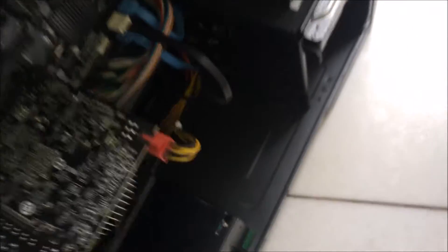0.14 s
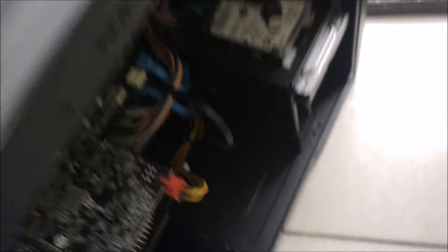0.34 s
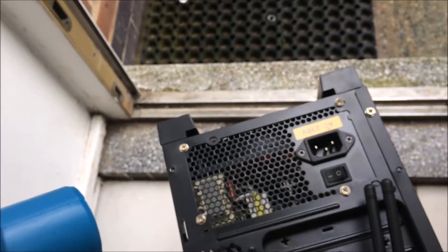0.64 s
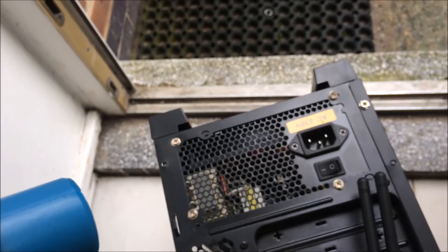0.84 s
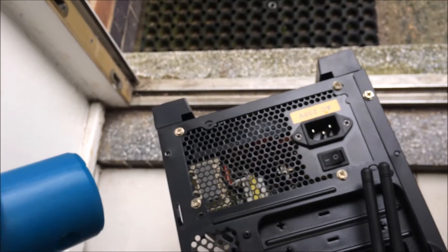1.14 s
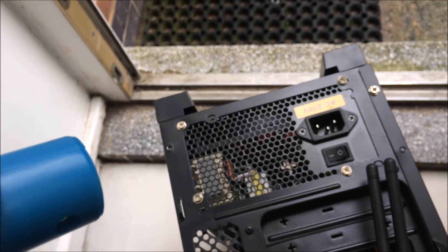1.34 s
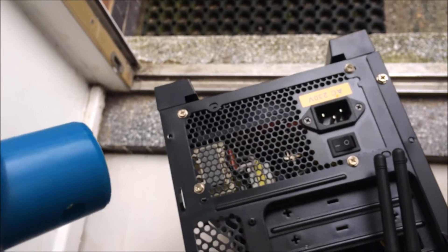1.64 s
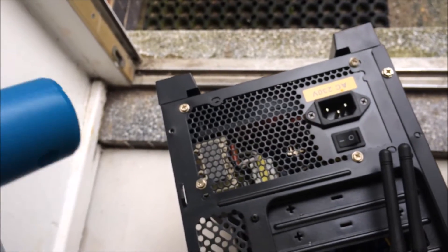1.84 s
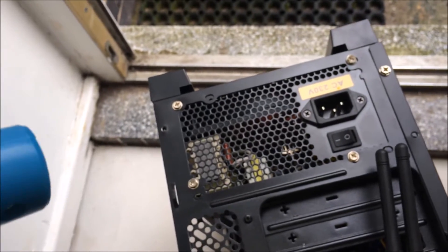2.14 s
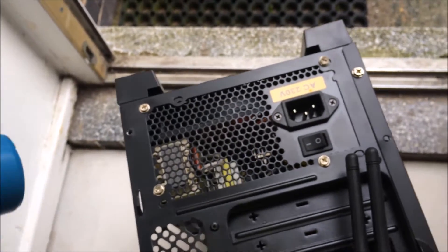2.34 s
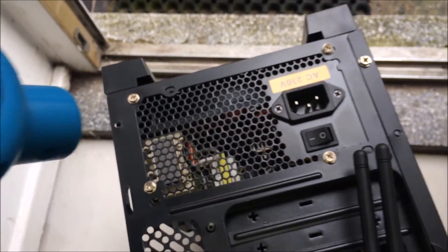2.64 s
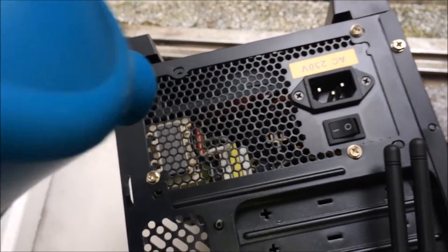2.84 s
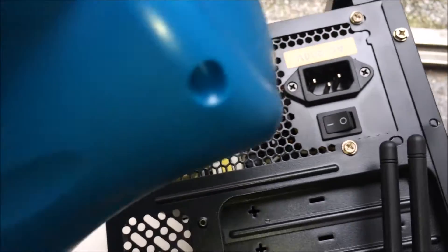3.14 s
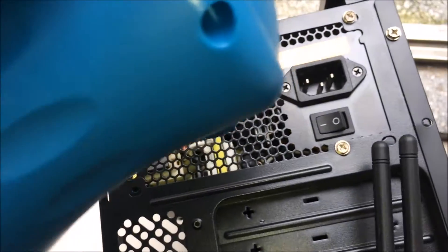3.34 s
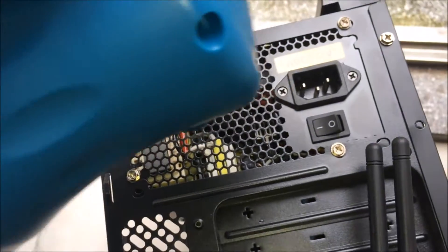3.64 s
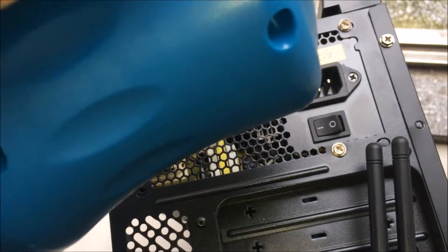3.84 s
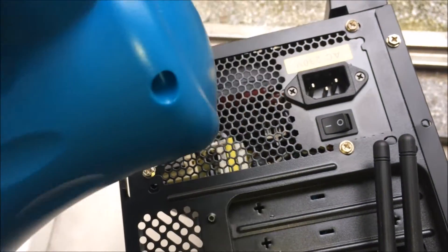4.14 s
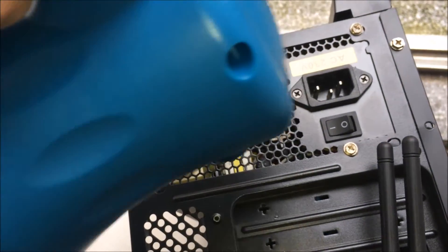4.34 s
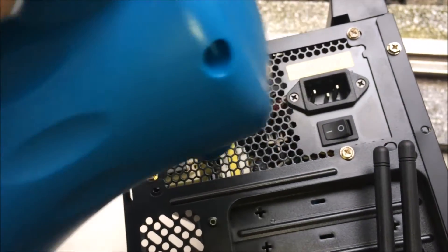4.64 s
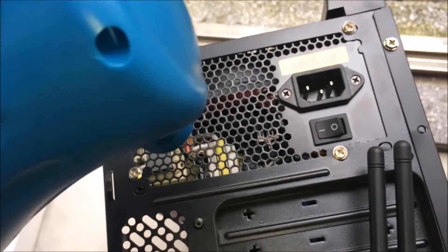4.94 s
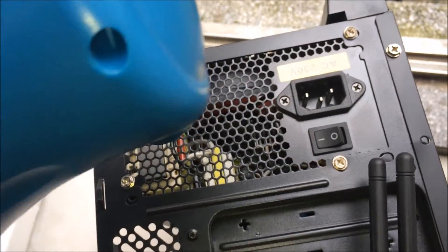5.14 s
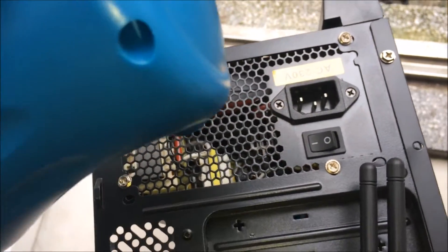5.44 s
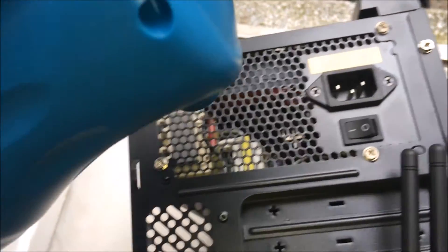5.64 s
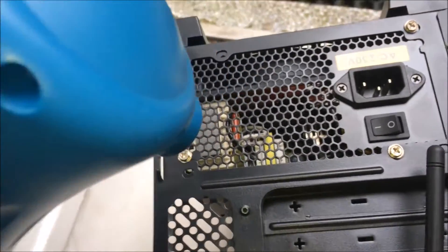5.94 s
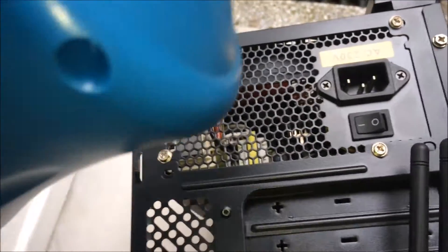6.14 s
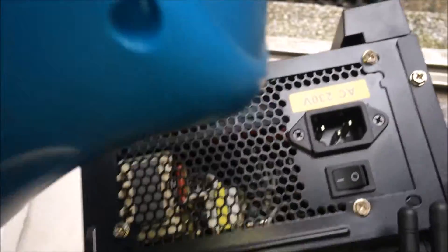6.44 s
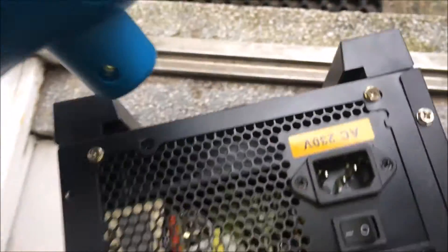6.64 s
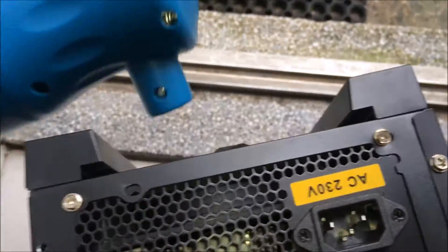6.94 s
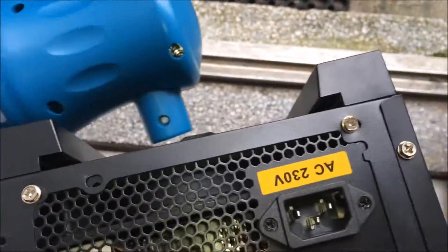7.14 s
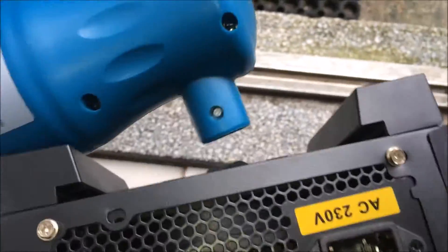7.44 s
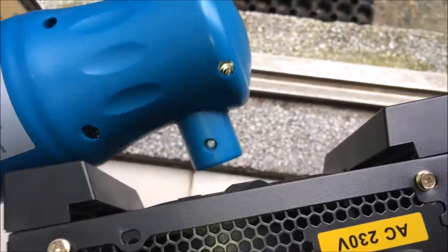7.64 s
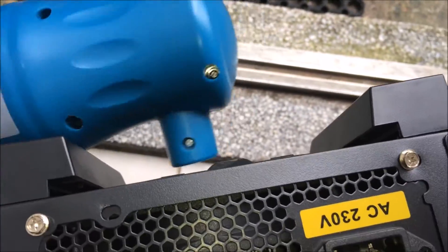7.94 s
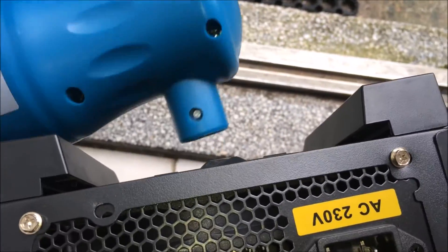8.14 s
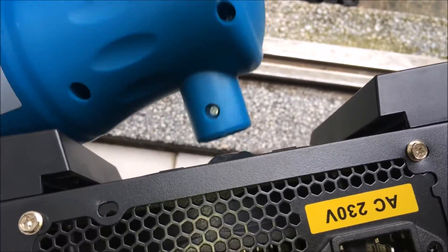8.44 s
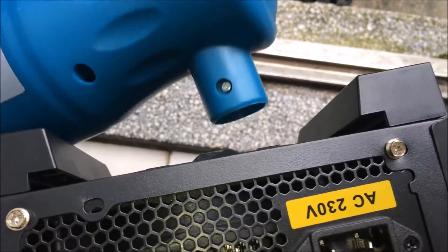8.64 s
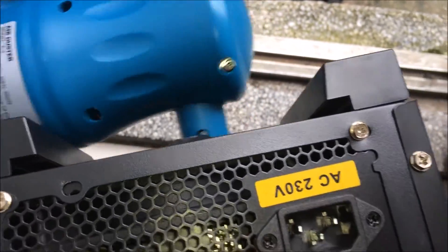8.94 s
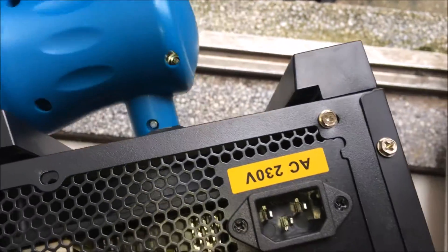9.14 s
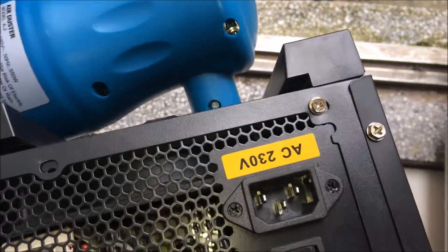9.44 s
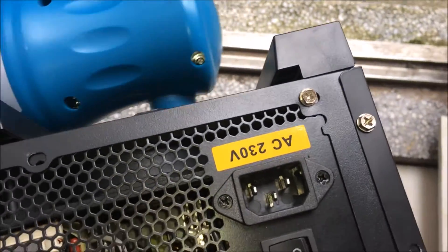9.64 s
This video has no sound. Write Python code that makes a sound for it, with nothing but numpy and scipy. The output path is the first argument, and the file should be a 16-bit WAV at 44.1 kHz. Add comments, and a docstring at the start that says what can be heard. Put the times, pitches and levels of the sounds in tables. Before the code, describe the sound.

A hand-held electric air duster blows into an open computer case with a loud rush and steady whine, then stops abruptly. A faint, dull outdoor rumble and two light clicks fill the pause. The switch snaps, the motor quickly spins up, and air rushes on through the case and its grille, with shifting whistles and hollow roars. It is close to the microphone, which catches a few soft puffs.

```python
"""A loud rush of air with a steady whine: a hand-held electric air duster blows into an open computer case.
It stops abruptly, leaving a dull outdoor murmur at the open door, faint rustles and two light clicks.
The switch snaps on, the impeller spins back up to its whine, and the jet rushes through the case and
the power supply's honeycomb grille. Their cavities colour it as the nozzle moves about; edges howl,
the grille roars, and a few puffs strike the microphone."""
import sys
import numpy as np
from scipy import signal
from scipy.fft import rfft, irfft
from scipy.io import wavfile
from scipy.ndimage import map_coordinates

SR = 44100
rng = np.random.default_rng(int(sys.argv[2]) if len(sys.argv) > 2 else 0)


def transcribe(signal):
    """Save signal, clipped to [-1, 1], as a 16-bit WAV file at the path in sys.argv[1]."""
    frames = np.atleast_2d(signal).T
    limited = np.clip(frames, -1, 1)
    pcm = np.round(limited * 32767).astype(np.int16)
    wavfile.write(sys.argv[1], SR, pcm)


N = 432180
T = np.arange(N) / SR
HZ = np.maximum(np.arange(N // 2 + 1) * SR / N, 1)
STOP_S, RESTART_S = 0.503, 1.879


def from_db(db):
    """Decibels to gain."""
    return 10 ** (np.asarray(db) / 20)


def unit_rms(x):
    """Scale to unit rms."""
    return x / np.sqrt(np.mean(x ** 2) + 1e-20)


def curves(rows):
    """Each column after the time, interpolated at every sample."""
    times_s, *columns = np.transpose(rows)
    return [np.interp(T, times_s, column) for column in columns]


def ramp(centre_s, length_s):
    """Linear rise from 0 to 1."""
    return np.clip((T - centre_s) / length_s + .5, 0, 1)


def swell(centre_s, length_s):
    """Smooth rise to 1 and fall; length at half height."""
    return np.cos(np.pi / 2 * np.clip((T - centre_s) / length_s, -1, 1)) ** 2


def drift(rate_hz, size=N):
    """Smooth random motion of unit rms."""
    step, settle = 20, 4000
    pole = np.exp(-2 * np.pi * step * rate_hz / SR)
    white = rng.standard_normal(size // step + settle + 2)
    slow = signal.lfilter([1], [1, -2 * pole, pole * pole], white)[settle:]
    return np.interp(np.arange(size) / step, np.arange(len(slow)), unit_rms(slow))


def narrow_noise(angle, width_hz):
    """Noise band of unit rms around a running phase."""
    size = len(angle)
    return unit_rms(drift(width_hz, size) * np.cos(angle) + drift(width_hz, size) * np.sin(angle))


def coloured_noise(colour, resonances=(), ripple_db=0):
    """Unit-rms noise with a broad colour, resonances and the fine ripple of close reflections."""
    hz, level_db = np.transpose(colour)
    shape_db = np.interp(np.log(HZ), np.log(hz), level_db)
    for centre_hz, width_hz, peak_db in resonances:
        shape_db += peak_db / (1 + (2 * (HZ - centre_hz) / width_hz) ** 2)
    for delay_s in rng.uniform(.002, .02, size=6):
        shape_db += ripple_db * np.cos(2 * np.pi * HZ * delay_s) / np.sqrt(3)
    return unit_rms(irfft(rfft(rng.standard_normal(N)) * from_db(shape_db), N))


def split_bands(x, edges_hz):
    """The bands between neighbouring edges."""
    spectrum = rfft(x)
    return [irfft(spectrum * ((HZ >= low) & (HZ < high)), N) for low, high in zip(edges_hz, edges_hz[1:])]


def impeller_speed(energy_tau_s=.17):
    """Share of full speed, 1 until the restart; then the motor feeds in energy until drag balances it."""
    energy = 1 - np.exp(-np.maximum(T - RESTART_S, 0) / energy_tau_s)
    return np.where(T < RESTART_S, 1, np.sqrt(energy))


# Jet spectrum at each place. Each row: frequency in Hz, relative density in dB.
CASE_COLOUR = [(30, -27.5), (65, -15), (120, -7), (330, -9.5), (480, -2), (1050, -5), (2000, -6.5),
               (5300, -9), (7500, -5.5), (10000, -16), (15000, -22.5)]
APPROACH_COLOUR = [(30, -30), (65, -15), (120, -12), (330, -22.5), (480, 1), (1050, -6), (2000, -3),
                   (5300, -9), (7500, -8.5), (10000, -12.5), (15000, -22)]
GRILLE_COLOUR = [(30, -35.5), (65, -17.5), (120, -8), (330, -23.5), (480, -0.9), (1050, -5), (2000, 1),
                 (5300, -3), (7500, -3), (10000, -7), (15000, -16)]
UNDERSIDE_COLOUR = [(30, -25.5), (65, -14), (120, -4.5), (330, -13.5), (480, 1), (1050, -5.5), (2000, 1.5),
                    (5300, 1.5), (7500, 0), (10000, -4.5), (15000, -13.5)]
VENT_COLOUR = [(30, -35.5), (65, -24), (120, -12.5), (330, -22), (480, -3.5), (1050, -12), (2000, 2),
               (5300, -2.5), (7500, -2.5), (10000, -7.5), (15000, -15.5)]
# Air resonances; the boom is common to all places. Each row: centre in Hz, width in Hz, gain in dB.
BOOM = (123, 21, 4.7)
CASE_CAVITIES = [(177, 45, 5.3), (255, 38, 5.3), (2180, 380, 9.5), (2640, 90, 6), (2980, 200, 4.5),
                 (3380, 130, 7.5), (3785, 80, 9), (4280, 130, 6), (4500, 170, 6), (5580, 120, 3),
                 (6090, 220, 5.5), (7010, 130, 3), (9640, 102, 5)]
APPROACH_CAVITIES = [(180, 116, 9.3), (276, 137, 18.5), (493, 70, 3.9), (750, 320, 1.5), (1130, 140, 5.2),
                     (2100, 93, 4.5), (2505, 700, 4.2), (3700, 340, 6.5), (4460, 380, 6.4), (6070, 410, 6),
                     (7000, 700, 4.4), (7670, 260, 4.5)]
GRILLE_CAVITIES = [(185, 70, 5), (263, 104, 16), (337.7, 42, 16), (712, 340, 10), (1490, 1100, 3.5),
                   (2590, 190, 3.5), (2950, 200, -1.5), (3470, 290, 5), (3830, 83, 3), (4200, 140, -0.5),
                   (4440, 230, 4.5), (6720, 990, 2.5)]
UNDERSIDE_CAVITIES = [(222, 17, 7), (336, 134, 11.5), (710, 200, 6.1), (880, 110, -2), (1160, 540, 7.5),
                      (1770, 260, 2), (2549, 200, 1.2), (3715, 420, 2), (5060, 500, -0.5)]
VENT_CAVITIES = [(200, 170, 9), (345, 148, 13.5), (746, 240, 10.5), (1050, 94, 11), (1320, 530, 6.4),
                 (1780, 290, 3.5), (2580, 90, 2.5), (2924, 170, -2), (3670, 200, 3.5), (3940, 130, 3.5)]
# Moves to the next place. Each row: centre in seconds, length in seconds.
NOZZLE_MOVES = [(1.0, 0.092), (3.032, 0.54), (6.864, 0.77), (8.961, 0.24)]


def turbulence(rush_band_hz=(1000, 7000)):
    """The jet excites the cavities of each place in turn, at equal strength in the rush band."""
    places = [(CASE_COLOUR, CASE_CAVITIES), (APPROACH_COLOUR, APPROACH_CAVITIES),
              (GRILLE_COLOUR, GRILLE_CAVITIES), (UNDERSIDE_COLOUR, UNDERSIDE_CAVITIES),
              (VENT_COLOUR, VENT_CAVITIES)]
    noises = [coloured_noise(colour, [BOOM, *cavities], ripple_db=1.11) for colour, cavities in places]
    air, *later = [noise / split_bands(noise, rush_band_hz)[0].std() for noise in noises]
    for (centre_s, length_s), arriving in zip(NOZZLE_MOVES, later):
        share = ramp(centre_s, length_s)
        air = np.sqrt(1 - share) * air + np.sqrt(share) * arriving
    return air


def nozzle_wander(air, pitch_share=.011, rate_hz=1.5):
    """The nozzle is never still, so all resonances slide slightly up and down."""
    position = np.cumsum(1 + pitch_share * drift(rate_hz))
    return map_coordinates(air, [position], order=3, mode="mirror")


def panel_echoes(air, count=3, reflect_db=-15, above_hz=1200):
    """Steel panels reflect the short waves; the hand wanders, so the echoes shift and the rush phases."""
    delays_s = rng.uniform(.002, .008, count)
    short_waves = signal.sosfilt(signal.butter(2, above_hz, "high", fs=SR, output="sos"), air)
    echoes = [np.interp(T - delay_s - .0002 * drift(.7), T, short_waves, left=0) for delay_s in delays_s]
    return air + from_db(reflect_db) * sum(echoes)


# The jet meets more or less of the case. Each row: time in seconds, strength in dB.
FIRST_BLOW = [(0.02, -15), (0.17, -13.5), (0.324, -15.5), (0.48, -14.5)]
SECOND_BLOW = [(2.05, -10.5), (2.55, -12.5), (3.15, -16), (3.4, -15), (3.75, -16.5), (4.35, -13.5),
               (4.6, -14.5), (4.75, -16.5), (5.03, -13), (5.35, -17.0), (5.8, -15.5), (6.1, -13),
               (6.28, -15.5), (6.45, -13.5), (6.87, -13), (7.07, -15.5), (7.38, -13), (8.35, -13.5),
               (8.9, -13), (9.23, -11.5), (9.39, -14.5), (9.57, -12.5), (9.79, -12.5)]
# Limits of five bands: rumble, hollow roar, rush, hiss, fizz.
BAND_EDGES_HZ = [26, 400, 1000, 2800, 7000, 18000]
# Each row: a band's share of the strength swing, exponent of speed, eddy spread in dB.
BAND_RESPONSE = [(.75, 0.56, 1.53), (0.61, 1.2, 1.26), (1.02, 1.6, 0.75), (0.91, 1.4, 0.5),
                 (0.35, 1.8, 0.44)]
# Fizz flares at the case's top edge, then drops in the lee.
# Each row: centre in seconds, length in seconds, gain in dB.
EDGE_SWEEP = [(6.83, 0.082, 3.5), (7.036, 0.16, -4)]


def jet(gust_spread_db=0.26, trim_db=-1.0):
    """The rush grows with impeller speed; gusts move all bands together, eddies move each alone."""
    bands = split_bands(panel_echoes(nozzle_wander(turbulence())), BAND_EDGES_HZ)
    bands[-1] *= from_db(sum(db * swell(centre_s, length_s) for centre_s, length_s, db in EDGE_SWEEP))
    strength_db, = curves([*FIRST_BLOW, *SECOND_BLOW])
    median_db = np.median(strength_db)
    speed = impeller_speed()
    gust_db = gust_spread_db * drift(7.7)
    out = np.zeros(N)
    for band, (swing, exponent, eddy_db) in zip(bands, BAND_RESPONSE):
        level_db = median_db + swing * (strength_db - median_db) + gust_db + eddy_db * drift(25)
        out += band * speed ** exponent * from_db(level_db + trim_db)
    return out


# Motor at full speed. Each row: time in seconds, turns per second, base level of the orders in dB.
FIRST_RUN = [(0.06, 685.7, -20.5), (0.398, 680, -24.5), (0.47, 685.4, -25)]
SECOND_RUN = [(2.2, 682.8, -27.5), (2.55, 682.8, -26.5), (3.05, 687, -20.5), (5.2, 687.7, -21.5),
              (5.8, 686.6, -20.5), (6.35, 686.3, -21.5), (6.85, 684.9, -24.5), (7.3, 689, -20.5),
              (8.7, 687, -22), (9.79, 685, -22)]
# Unbalance tone and octave of the blade tone. Each row: multiple of the speed, relative level in dB.
ORDERS = [(1, -1), (14, -22)]
# Blade whistle, varying as the blower is turned. Each row: time in seconds, full-speed level in dB.
BLADE_TONE = [(2.6, -39), (3.3, -34.5), (4.6, -38), (5.6, -31.5), (6.2, -44), (7, -41), (7.7, -47),
              (9.7, -33)]
# Each row: centre in seconds, length in seconds, multiple of the speed, width in Hz, level in dB.
SPIN_UP_TONES = [(1.985, .07, 3.04, 95, -20.5), (2.1, .14, 3, 100, -19.5), (2.21, 0.15, 7, 60, -21)]


def whine(blades=7, waver_share=0.000706, flutter_db=1.0, speed_exponent=1.5):
    """Tones locked to the impeller flutter in the moving air; rough ones flare as it gathers speed."""
    full_speed_hz, level_db = curves([*FIRST_RUN, *SECOND_RUN])
    speed = impeller_speed()
    rotation_hz = full_speed_hz * speed * (1 + waver_share * drift(5))
    angle = 2 * np.pi * np.cumsum(rotation_hz) / SR
    tones = sum(from_db(level_db + db + flutter_db * drift(8.1)) * np.sin(order * angle)
                for order, db in ORDERS)
    blade_db = curves(BLADE_TONE)[0] + flutter_db * drift(5.9)
    whistle = from_db(blade_db) * np.sin(blades * angle)
    climbing = sum(from_db(db) * swell(centre_s, length_s) * narrow_noise(order * angle, width_hz)
                   for centre_s, length_s, order, width_hz, db in SPIN_UP_TONES)
    return np.sqrt(2) * speed ** speed_exponent * (tones + whistle) + climbing


# Each row: centre in seconds, length in seconds, start and end pitch in Hz, width in Hz, level in dB.
HOWLS = [(0.134, 0.21, 2390, 2390, 260, -20.5), (1.918, 0.011, 3020, 3150, 20, -13),
         (2.52, 0.5, 2170, 2086, 170, -19.5), (3.4, 0.43, 4470, 4560, 67, -26),
         (3.45, 0.37, 2600, 2540, 50, -32), (3.75, 0.46, 3470, 3430, 60, -28),
         (3.7, .35, 7150, 6800, 82, -31), (3.92, .2, 4520, 4500, 60, -31),
         (4.318, .16, 3360, 3420, 186, -21), (4.449, .45, 2480, 2560, 150, -29),
         (4.647, 0.61, 1595, 1754, 290, -21), (4.675, .25, 209.4, 218, 42, -29),
         (5.05, 0.31, 3350, 3370, 160, -24), (5.5, 0.59, 4538, 4448, 85, -26.5),
         (6.617, 0.33, 3280, 3320, 60, -28), (6.85, 0.24, 3765, 3767, 50, -34),
         (7.45, .3, 3740, 3760, 48, -31), (6.7, 0.46, 2090, 2140, 66, -30),
         (7.38, 0.13, 3152, 3134, 60, -25), (7.4, 0.17, 2556, 2620, 160, -24),
         (7.851, .3, 5100, 5250, 145, -28), (7.7, .15, 3700, 3720, 50, -28),
         (7.951, .2, 3570, 3620, 55, -24.5), (8.2, .25, 4350, 4390, 90, -29),
         (8.68, 0.72, 3697, 3750, 67, -25), (8.552, .2, 4895, 4920, 20, -27),
         (9.139, 0.3, 1945, 2080, 360, -21), (9.2, 0.26, 2615, 2670, 350, -19),
         (9.2, .25, 3460, 3560, 420, -22.5), (9.579, 0.26, 2040, 2080, 22, -24),
         (9.62, 0.41, 162.7, 224.8, 3.6, -32)]


def howls():
    """Narrow noise around a gliding pitch swells and fades as the jet crosses an edge."""
    out = np.zeros(N)
    for centre_s, length_s, start_hz, end_hz, width_hz, level_db in HOWLS:
        near = np.flatnonzero(abs(T - centre_s) < length_s * .7)
        progress = (T[near] - centre_s) / length_s + .5
        angle = 2 * np.pi * np.cumsum(start_hz + (end_hz - start_hz) * progress) / SR
        envelope = np.sqrt(np.hanning(len(angle)))
        out[near] += from_db(level_db) * narrow_noise(angle, width_hz) * envelope
    return out


def ring_on(air, at_s, length_s=.02, spacing_hz=700, size=1024):
    """The strongest pitches just before a moment ring on briefly as pure tones."""
    window, end = np.hanning(size), round(at_s * SR)
    amplitudes = 2 * abs(rfft(air[end - size:end] * window)) / window.sum()
    peaks, _ = signal.find_peaks(amplitudes, distance=spacing_hz * size / SR)
    out, near = np.zeros(N), abs(T - at_s) < length_s
    for peak in peaks:
        hz = peak * SR / size
        out[near] += amplitudes[peak] * np.sin(2 * np.pi * (hz * T[near] + rng.random()))
    return out * swell(at_s, length_s)


# Each row: centre in seconds, length in seconds, depth in dB, ring gain in dB.
STUTTERS = [(.135, .012, -12, 1), (.2, .015, -18, 3), (3.527, .014, -20, 3), (3.676, .014, -20, 3),
            (3.719, .012, -16, 3), (4.337, .013, -16, 1), (4.893, .014, -18, 4), (5.299, .015, -20, 3),
            (9.351, .013, -16, 3), (9.522, .013, -18, 3)]


def stutter(air, above_hz=1200):
    """The top of the rush drops out for an instant, leaving a thin ring."""
    upper = signal.sosfiltfilt(signal.butter(2, above_hz, "high", fs=SR, output="sos"), air)
    for centre_s, length_s, depth_db, ring_db in STUTTERS:
        lost = upper * (1 - from_db(depth_db * swell(centre_s, length_s)))
        air = air - lost + from_db(ring_db) * ring_on(upper, centre_s)
    return air


# Outdoor spectra. Each row: frequency in Hz, relative density in dB.
RUMBLE_COLOUR = [(18, -39.5), (30, -12), (63, -2.5), (123, -12.5), (160, -4), (181, -9.5), (345, -21),
                 (482, -20.5), (656, -21.5), (766, -17.5), (1040, -22), (1570, -27), (3070, -39.5),
                 (4500, -42.5), (14000, -51)]
MURMUR_COLOUR = [(150, -20), (300, -2), (500, -1), (820, 0), (1200, -12), (3000, -35)]
# Faint hollow notes. Each row: centre in Hz, width in Hz, gain in dB.
RUMBLE_NOTES = [(155, 25, 3.5), (775, 45, 5), (1570, 70, 4)]
# Each row: time in seconds, level in dB.
RUMBLE_LEVEL = [(.6, -54), (1.05, -55), (1.2, -52.5), (1.5, -53), (1.85, -52.5)]
# One row: centre in seconds, length in seconds, level in dB.
MURMUR_SWELL = (1.39, .18, -57.5)


def outdoors(onset_s=0.592, surge_db=1.0):
    """Dull far-off rumble through the open door; a midrange murmur swells once."""
    level_db = curves(RUMBLE_LEVEL)[0] + surge_db * drift(11)
    rumble = from_db(level_db) * coloured_noise(RUMBLE_COLOUR, RUMBLE_NOTES, ripple_db=1.8)
    centre_s, length_s, murmur_db = MURMUR_SWELL
    murmur = from_db(murmur_db) * swell(centre_s, length_s) * coloured_noise(MURMUR_COLOUR)
    return rumble * ramp(onset_s, .012) + murmur


# Each row: centre in seconds, length in seconds, squeak pitch in Hz, squeak level in dB.
RUSTLES = [(.67, .06, 3500, -78), (.95, .08, 3450, -76), (1.24, .09, 3850, -74), (1.868, .018, 3000, -58)]
# Each row: frequency in Hz, relative density in dB.
FRICTION_COLOUR = [(1000, -20), (3000, -2), (4000, 0), (4800, -5), (7500, -6), (14000, -20)]


def rustles(squeak_width_hz=200, friction_gain_db=-2):
    """Thin, squeaky friction as the blower shifts in the hand and the thumb slides onto the switch."""
    friction = from_db(friction_gain_db) * coloured_noise(FRICTION_COLOUR)
    out = np.zeros(N)
    for centre_s, length_s, squeak_hz, level_db in RUSTLES:
        squeak = narrow_noise(2 * np.pi * squeak_hz * T, squeak_width_hz)
        out += from_db(level_db) * swell(centre_s, length_s) * (friction + squeak)
    return out


# Two handling clicks, then the power switch.
# Each row: start in seconds, attack rms in dB, low and high cutoff in Hz, crack T60 in seconds.
CLICKS = [(1.686, -41, 1750, 2800, .04), (1.756, -34.5, 1100, 6000, .09), (1.879, -12.5, 1300, 9000, .02)]
# Each row: frequency in Hz, relative level in dB, T60 in seconds.
SHELL_MODES = [(1860, -17, .04), (2720, -6, 0.04), (3500, 1, 0.022), (4870, -18, .07), (6470, -1, 0.036),
               (7600, 7, 0.029)]


def clicks(attack_s=.003, ring_db=-12, tail_db=-26, tail_t60_s=.2):
    """A crack of noise, the ring of the plastic shell and a short tail from the doorway."""
    out, t = np.zeros(N), np.arange(SR // 4) / SR
    ring = sum(from_db(ring_db + db - 60 * t / t60_s) * np.sin(2 * np.pi * hz * t)
               for hz, db, t60_s in SHELL_MODES)
    for start_s, level_db, low_hz, high_hz, t60_s in CLICKS:
        envelope = from_db(-60 * t / t60_s) + from_db(tail_db - 60 * t / tail_t60_s)
        crack = rng.standard_normal(len(t)) * envelope
        contact_band = signal.butter(2, [low_hz, high_hz], "band", fs=SR, output="sos")
        click = signal.sosfilt(contact_band, crack + ring)
        start = round(start_s * SR)
        out[start:start + len(t)] += from_db(level_db) * click / click[t < attack_s].std()
    return out


# Each row: centre in seconds, length in seconds, level in dB.
ROARS = [(2.85, 0.22, -21), (3.416, .22, -23), (3.99, 0.17, -18.5), (4.649, 0.28, -16), (5.05, 0.31, -25),
         (6.045, 0.26, -23.5), (6.45, 0.14, -17)]
# Each row: frequency in Hz, relative density in dB.
ROAR_COLOUR = [(100, -40), (450, -17.5), (640, 0.5), (780, 5.5), (900, -1.5), (1200, -25), (4000, -49)]


def roars():
    """The power supply's cavity sounds a hollow note when the jet blows straight into its honeycomb."""
    power = sum(from_db(db) ** 2 * swell(centre_s, length_s) for centre_s, length_s, db in ROARS)
    return coloured_noise(ROAR_COLOUR) * np.sqrt(power)


# Each row: centre in seconds, width in seconds, peak in dB.
PUFFS = [(7.872, 0.0035, -20), (8.398, 0.0026, -13), (8.411, .004, -23)]


def puffs():
    """Each puff of air strikes the microphone as one soft dip of pressure."""
    out = np.zeros(N)
    for centre_s, width_s, peak_db in PUFFS:
        offset_squared = ((T - centre_s) / width_s) ** 2
        out -= from_db(peak_db) * (1 - 2 * offset_squared) * np.exp(-np.minimum(offset_squared, 50))
    return out


def scene(tail_db=-24.5, tail_t60_s=0.059):
    """The first blow ends abruptly; the second starts with the switch. All sources are centred."""
    stopped = ramp(STOP_S, 0.0019)
    tail = stopped * from_db(tail_db - 60 * np.maximum(T - STOP_S, 0) / tail_t60_s)
    restarted = ramp(RESTART_S + 0.0016, .003)
    gate = 1 - stopped + tail + restarted
    blower = stutter(jet() + howls()) + whine() + roars()
    mono = gate * blower + puffs() + clicks() + rustles() + outdoors()
    return np.array([mono, mono])


def record(dry, ceiling=.98, cutoff_hz=15420, transition_hz=300):
    """Peak clipping, then a steep low-pass."""
    low_pass = 1 - np.clip((HZ - cutoff_hz) / transition_hz + .5, 0, 1)
    return irfft(rfft(np.clip(dry, -ceiling, ceiling)) * low_pass, N)


dry = scene()
out = record(dry)
transcribe(out)
```